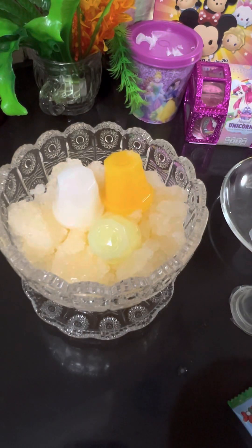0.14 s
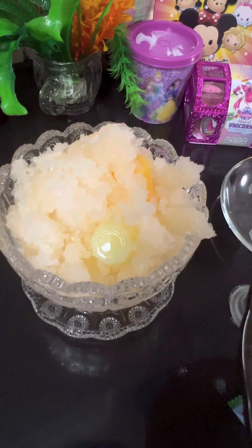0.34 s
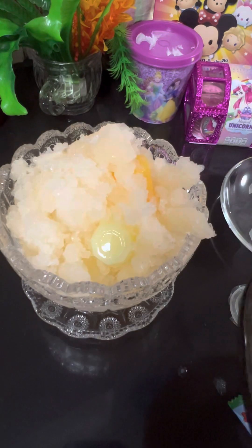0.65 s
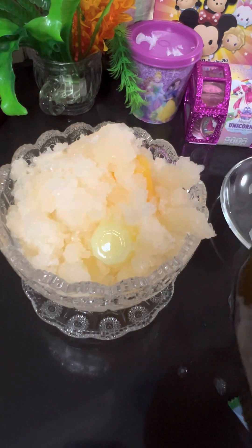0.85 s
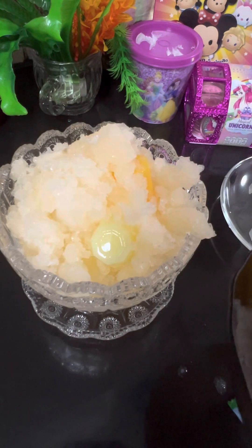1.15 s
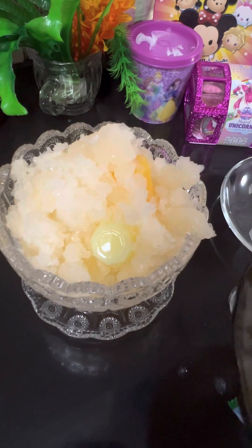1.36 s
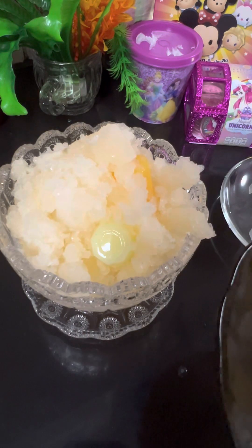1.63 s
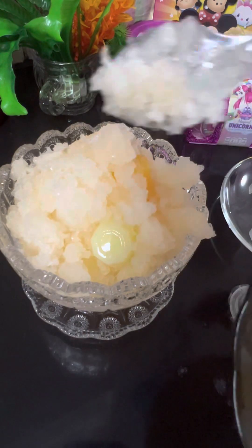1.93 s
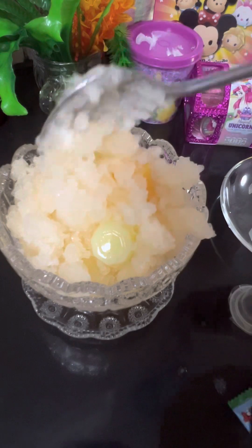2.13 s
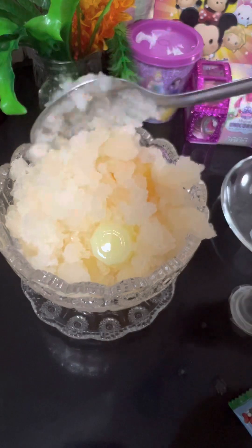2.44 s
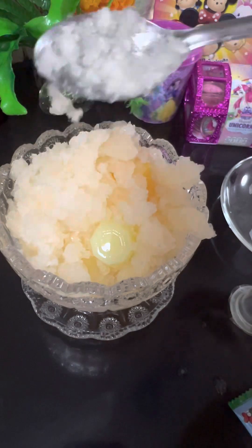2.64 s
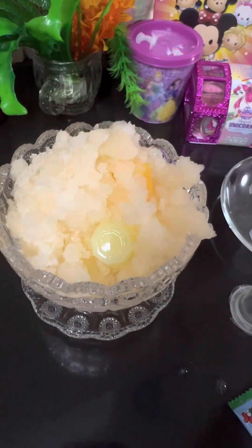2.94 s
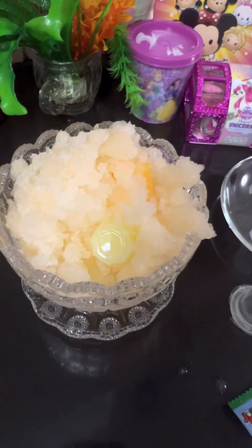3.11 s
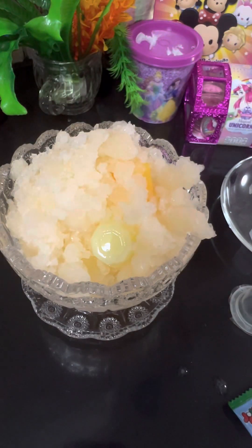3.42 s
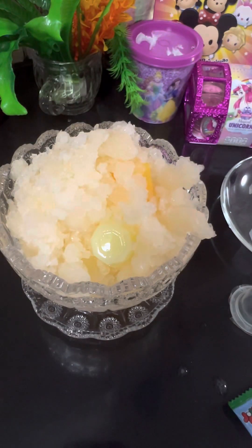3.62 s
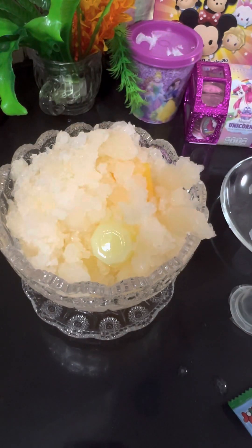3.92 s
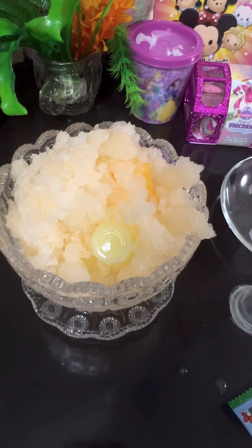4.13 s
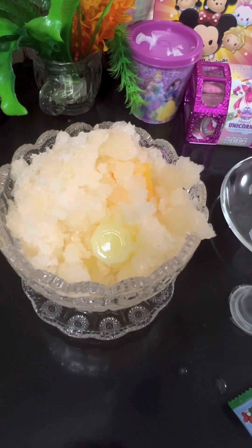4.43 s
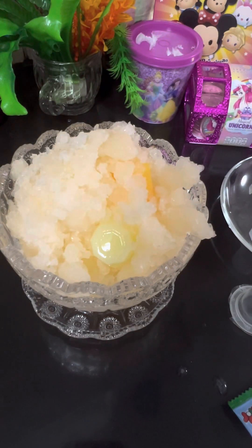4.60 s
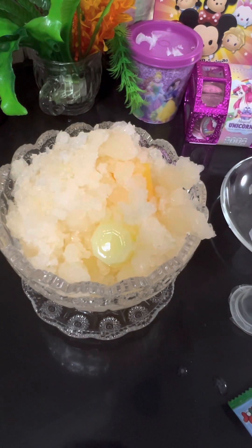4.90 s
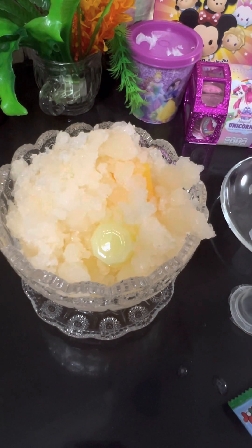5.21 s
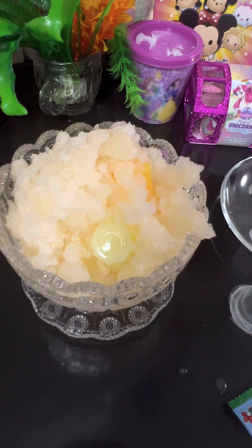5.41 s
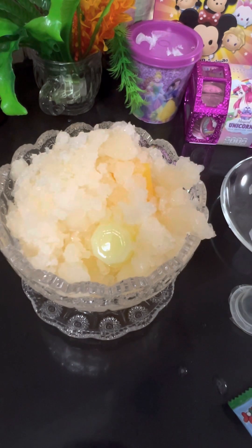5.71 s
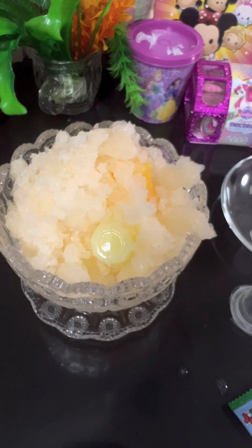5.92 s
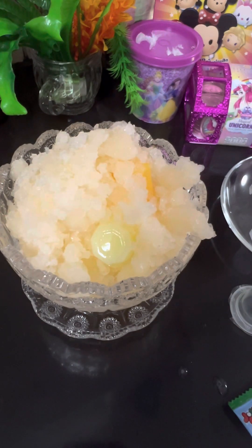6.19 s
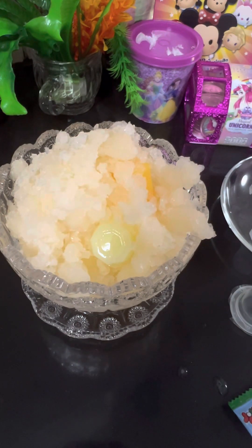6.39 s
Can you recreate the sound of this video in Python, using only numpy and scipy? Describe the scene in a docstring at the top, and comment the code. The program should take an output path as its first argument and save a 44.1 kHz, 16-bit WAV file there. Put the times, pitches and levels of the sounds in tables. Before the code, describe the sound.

A small, hard kitchen with faint low fan rumble and slightly wavering mains hum throughout. Close crisp ice crunches come at 0.1 and 0.25 s, with a tiny dropout near 0.35. From 0.6 to 1.0 s, lumps break in loud, dry, sharp snaps, with a metallic scrape around 0.75-0.85 and a slight steel-bowl ring. From 1.2 to 2.1 s only faint crackles and a soft hollow rustle at 1.8. Grainy scoops rasp at 2.35, 2.7 and 2.95; around 3.2 small cracks mix with quick spoon-on-glass clinks, more at 3.44 and 3.74. Roomier scoops follow at 3.57, 4.13, 4.48, a strong short one at 4.68, and another at 5.09. A bowl lands with a loud, hollow knock at 5.23, a buzzy clink at 5.36, a crunch at 5.45, then a softer double knock at 5.63-5.66. Near-quiet hum remains, with one barely audible rasp at 6.24.

```python
"""A metal spoon digs coarse shaved ice out of one bowl and heaps it into a glass one, in a small hard kitchen.
Lumps snap and loose crystals crunch close by: swells of noise grains filtered by resonances of bowl and spoon.
Scoops rasp farther off, the spoon's edge scrapes, and the spoon clinks with damped and free modes.
A bowl is set down with two knocks, the second one double: filtered noise bursts plus decaying sines.
Noise reflections form the room; fan rumble and wavering mains tones lie underneath."""
import sys
import numpy as np
from scipy import signal
from scipy.fft import rfft, irfft
from scipy.io import wavfile
from scipy.ndimage import uniform_filter1d, map_coordinates

SR = 44100
rng = np.random.default_rng(int(sys.argv[2]) if len(sys.argv) > 2 else 0)


def inscribe(sig):
    """Save sig as 16-bit PCM at rate SR to the path in sys.argv[1].

    A 1-D sig is mono; a 2-D sig holds one channel per row.
    Samples are clipped to [-1, 1] before scaling.
    """
    pcm = np.round(np.clip(np.atleast_2d(sig).T, -1, 1) * 32767)
    wavfile.write(sys.argv[1], SR, pcm.astype(np.int16))


N = 288855
SIZE, LEAD = 2 ** 15, 2 ** 13   # samples per event buffer; samples ahead of the event
EVENT_MS = (np.arange(SIZE) - LEAD) * 1000 / SR
SINCE_EVENT_S = np.maximum(EVENT_MS, 0) / 1000
BUFFER_S = np.arange(SIZE) / SR
HZ = np.maximum(np.arange(SIZE // 2 + 1) * SR / SIZE, 1)
MIC_DELAY_S = .0005

# Lumps cracking under the spoon. Each row: start in seconds, level in dB, low edge in Hz, tilt in dB per octave,
# decay of the crack in ms, share passed to the steel bowl in dB, crumbling in dB.
SNAPS = [(0.637, -17.5, 323, 1.14, 0.76, -27, -13.5), (0.6424, -33, 342, 0, 1.1, -16, 1),
         (0.7373, -17, 835, 0.5, 0.94, -23.5, -23), (0.882, -22.5, 710, 1.9, 0.35, -20.5, -20),
         (0.8846, -30.5, 744, -0.5, 0.75, -24, -17), (0.8898, -32.5, 730, -0.5, 0.79, -24, -15),
         (0.8966, -32, 710, 1.5, .7, -30, -19), (1.0113, -29.5, 854, 1, 1.05, -17, -18.5),
         (1.2523, -51, 650, -5.5, 1.1, -31, -24), (1.2955, -46, 800, -3, 1, -29, -24),
         (1.356, -58.5, 683, -2.5, 1.3, -33, -17), (2.395, -45.5, 2450, 4, 2.2, -24.5, -11),
         (2.402, -47, 2530, 1.5, 3.1, -28, -14), (2.425, -53.5, 455, -11.5, 2, -20, -14),
         (2.668, -57.5, 1200, 15.5, 3.1, -31, -11), (2.674, -54.5, 550, -12, 0.84, -12.5, -14),
         (2.989, -58, 5060, 8, 0.84, -28, -14), (3.063, -47.5, 513, -6, 1.4, -20, -11),
         (3.1748, -36, 358, 1.5, 1, -16, -16), (3.177, -37.5, 360, 1.2, 0.83, -16, -20),
         (5.836, -67.5, 2990, 2, 2.2, -32, -11)]
# Resonances of the packed bowl under a blow. Each row: frequency in Hz, width in Hz, level in dB.
LUMP_MODES = [(457, 44, 3), (862, 86, 6.5), (1126, 83, 3), (1440, 120, -6.5), (1740, 440, -0.5),
              (2605, 290, -0.5), (4480, 1700, -7), (5540, 53, -5), (7850, 540, -2.5), (9340, 400, -7),
              (11900, 1900, -6), (15000, 1200, -22.5)]
# Clusters of close modes in the steel ice bowl. Each row: frequency in Hz, width in Hz, level in dB.
ICE_BOWL_MODES = [(980, 92, -1.5), (1760, 160, -6.5), (2424, 120, 2.5), (2682, 91, 4.5), (4260, 250, -3.5),
                  (4800, 180, -0.5)]
# a typical lump; smaller ones have a higher edge, clang more and shake the room less
LUMP_EDGE_HZ, LUMP_LEVEL_DB = 720, -42.5
CLANG_DB, CLANG_DB_PER_OCTAVE, CLANG_DB_PER_DB = -0.5, 3.5, 0.05
# louder snaps are closer and drier
SNAP_ROOM_DB, ROOM_LOSS_DB_PER_OCTAVE, ROOM_LOSS_DB_PER_DB = -12.5, 7.5, 0.32
STEEL_CONTACT_DB = 18   # a blow that reaches the steel also takes on its colour


def snaps(split_db=-7, crumble_ms=6.7, strain_ms=0.54, clang_hz=3000):
    """A lump strains, splits and crumbles for a few ms; returns direct sound, room share and steel share."""
    near, far, steel = np.zeros((3, 2, N))
    lump = from_db(resonant(LUMP_MODES, between_db=-8.0))
    bowl = from_db(resonant(ICE_BOWL_MODES, between_db=-18.0))
    clang = np.exp(-2 * np.log2(HZ / clang_hz) ** 2)
    for s, level_db, low_hz, tilt_db, decay_ms, steel_db, crumble_db in SNAPS:
        smallness_octaves = np.log2(low_hz / LUMP_EDGE_HZ)
        force_db = level_db - LUMP_LEVEL_DB
        clang_db = CLANG_DB + CLANG_DB_PER_OCTAVE * smallness_octaves + CLANG_DB_PER_DB * force_db
        room_loss_db = ROOM_LOSS_DB_PER_OCTAVE * smallness_octaves + ROOM_LOSS_DB_PER_DB * force_db
        room_db = SNAP_ROOM_DB - room_loss_db

        crack = grains(0.22, decay_ms, grain_db=8.5, alike=0.63)
        crack = crack + from_db(crumble_db) * grains(strain_ms, crumble_ms, grain_db=6.0, alike=1.0)
        # the split itself is one sharp click
        crack[:, LEAD] += from_db(split_db) * np.sqrt(np.sum(crack ** 2) / 2)

        # flatten the burst's own spectrum, so the lump and bowl resonances set the colour
        crack_power = np.mean(np.abs(rfft(crack)) ** 2, axis=0)
        even_db = -10 * np.log10(uniform_filter1d(crack_power, size=300))
        low_cut_db = -10 * np.log10(1 + (low_hz / np.maximum(HZ, 150)) ** 8)
        body_db = 20 * np.log10(np.hypot(lump, bowl * from_db(steel_db + STEEL_CONTACT_DB)))
        body_db = body_db + own_resonances(depth_db=3.5)
        sound = shaped(crack, body_db + even_db + low_cut_db + clang_db * clang, tilt_db)
        add(near, s, sound, level_db)
        add(far, s, sound, level_db + room_db)
        add(steel, s, sound, level_db + steel_db)
    return near, far, steel


def ice_bowl(push, ring_t60=0.17):
    """The steel bowl rings on after snaps and scrapes: convolution with decaying modal noise."""
    noise = pair(rng.standard_normal((2, SIZE)), 1.0)
    ring = irfft(rfft(noise) * from_db(resonant(ICE_BOWL_MODES, between_db=-20.0)))
    ring = ring * from_db(-60 * BUFFER_S / ring_t60)
    return signal.fftconvolve(push, rms_one(ring) / np.sqrt(SIZE), axes=1)[:, :N]


# Loose crystals crushed close by. Each row: peak in seconds, level in dB, rise in ms, fall in ms, low edge in Hz,
# colouring by the spoon from 0 to 1.
CRUNCHES = [(0.093, -34, 4.9, 37, 400, 0), (0.2343, -33, 1.8, 18, 400, .15), (.25, -33, 4.6, 13, 400, 0),
            (.272, -43.5, 9.8, 37, 400, 0.04), (0.595, -43, 1.8, 20.7, 400, 0.24),
            (0.776, -41.5, 135, 220, 800, 0.2), (.915, -44, 14, 60, 790, 0.4), (1.02, -56, 27, 73, 798, .2),
            (1.24, -55.5, 23, 64, 4000, 0.26), (1.32, -55.5, 33, 89, 500, 0.14),
            (1.431, -55.5, 8.6, 8.4, 3010, 0), (2.011, -53.5, 5.7, 49, 3300, 0.03),
            (2.074, -48, 18, 61, 3440, 0.27), (3.034, -50, 8.6, 35, 3000, 0.24),
            (3.19, -48.5, 30, 42, 2500, .6), (3.973, -59.5, 13, 75, 500, 0.4),
            (4.08, -54, 30, 170, 503, 0.67), (4.428, -55.5, 26, 122, 2040, 0.24),
            (5.445, -48.5, 21.6, 69, 500, 0), (5.621, -50, 5.7, 68, 2480, .1)]
# Colour of the crunches. Each row: frequency in Hz, level in dB.
CRUNCH_COLOUR = [(150, -13), (400, -20.5), (800, -6), (1600, -7.5), (3200, -1), (5000, -0.5), (7000, 4.5),
                 (9500, 3), (12000, 6), (15500, 6.5)]
# Brightness of the crunches over time. Each row: time in seconds, tilt in dB per octave.
CRUNCH_TILT = [(.2, -3.5), (2, -4), (3.1, -2), (4, -7), (5.5, -7.5)]
# Spoon modes, also played by clinks(). Each row: frequency in Hz, damped width in Hz, level in contact in dB,
# level ringing free in dB.
SPOON_MODES = [(2065, 130, -8.5, -15), (3125, 44, -3, -2), (3420, 230, -5.5, -6), (5780, 94, -1.5, 1),
               (7800, 340, -11.5, -14), (8600, 260, -12, -6), (9340, 180, -7.5, 1), (11150, 160, -14, -4),
               (12985, 170, -8, -8), (15050, 170, -13, -14)]
FINE_SHELF_DB = -8   # fine crystals are weaker below their low edge
CRUNCH_ROUNDNESS = 1.7   # holds for a moment, then ends quickly


def crunches():
    """Loose crystals give way quickly and trickle on; those that rub on the spoon take on its resonances."""
    out = np.zeros((2, N))
    spoon_db = resonant([mode[:3] for mode in SPOON_MODES], between_db=-20)
    for s, level_db, rise_ms, fall_ms, low_hz, on_spoon in CRUNCHES:
        swarm = crackle(rise_ms, fall_ms, grain_db=3.5, clump_db=2.0, alike=0.38,
                        roundness=CRUNCH_ROUNDNESS, count=3)
        below_edge = 1 / (1 + (HZ / low_hz) ** 12)
        colour_db = at_hz(CRUNCH_COLOUR, HZ) + FINE_SHELF_DB * below_edge
        colour_db = colour_db + on_spoon * spoon_db + own_resonances(depth_db=3.0)
        tilt_db = np.interp(s, *np.transpose(CRUNCH_TILT))
        add(out, s, shaped(swarm, colour_db, tilt_db), level_db)
    return out


# The spoon ploughing through the heap. Each row: peak in seconds, level in dB, rise in ms, tilt in dB per octave,
# room share in dB.
SCOOPS = [(0, -53, 8.1, 10, -0.5), (1.52, -75, 15, 10, -3), (2.345, -43.5, 46, 3, -2),
          (2.68, -53, 7.9, -2, -2), (2.948, -43, 35, 1.5, -1.5), (3.569, -45.5, 23.6, 2.5, -2),
          (4.131, -38, 7.1, 1.5, -5), (4.179, -45, 8.8, 2, -1), (4.476, -45.5, 3, -2.5, 2),
          (4.643, -51, 29, 0.5, -1.5), (4.675, -34.5, 3.4, -2, -5), (4.961, -70.5, 52, -5, 0.5),
          (5.088, -40, 4.4, -3, -1.5), (5.441, -46.5, 40, -3.5, 0), (6.24, -69.5, 57, -0.5, -2.5)]
# Colour of the scoops. Each row: frequency in Hz, level in dB.
SCOOP_COLOUR = [(120, -7.5), (400, -2), (750, -2), (1100, -2.5), (1420, -4.5), (1850, -1), (2500, 1.5),
                (3300, -1.5), (3900, -2.5), (4550, -4.5), (5500, -13), (7500, -14), (10000, -22.5),
                (15500, -31.5)]
SCOOP_FALL_MS, SCOOP_FALL_GROWTH = 18.5, 0.25   # fall after a 10 ms rise; exponent on the rise


def scoops():
    """The spoon ploughs coarse ice; slow pushes also die away more slowly; returns direct sound and room share."""
    near, far = np.zeros((2, 2, N))
    for s, level_db, rise_ms, tilt_db, room_db in SCOOPS:
        fall_ms = SCOOP_FALL_MS * (rise_ms / 10) ** SCOOP_FALL_GROWTH
        swarm = crackle(rise_ms, fall_ms, grain_db=5.5, clump_db=2.5, alike=0.42, roundness=1.3)
        sound = shaped(swarm, at_hz(SCOOP_COLOUR, HZ) + own_resonances(depth_db=2.6), tilt_db)
        add(near, s, sound, level_db)
        add(far, s, sound, level_db + room_db)
    return near, far


# The spoon's edge dragging over hard ice. Each row: peak in seconds, level in dB, rise in ms, fall in ms.
SCRAPES = [(0.754, -40.5, 8, 32), (.835, -34.5, 45, 40)]
# Resonances of the scrape. Each row: frequency in Hz, width in Hz, level in dB.
SCRAPE_MODES = [(1020, 230, -9), (1930, 290, -0.5), (2430, 130, 6), (3050, 230, -6.5), (4090, 400, -3),
                (4650, 190, 3), (7460, 1200, -12)]


def scrapes(slide=0.021, slides_per_s=70):
    """The spoon's edge drags over hard ice; resonances shift by a few percent as the contact slides."""
    out = np.zeros((2, N))
    for s, level_db, rise_ms, fall_ms in SCRAPES:
        swarm = crackle(rise_ms, fall_ms, grain_db=6.0, clump_db=4.0, alike=0.56)
        rasp = shaped(swarm, resonant(SCRAPE_MODES, between_db=-19.5), 0)
        shift_samples = slide * SR / slides_per_s * drift(slides_per_s, size=SIZE)
        position = np.arange(SIZE) + shift_samples
        add(out, s, np.stack([map_coordinates(side, [position]) for side in rasp]), level_db)
    return out


# The spoon grazing the glass. Each row: start in seconds, level in dB, chatter in ms, tilt in dB per octave,
# pitch ratio set by the grip, twisting mode in dB.
CLINKS = [(3.179, -42.5, 9.1, -1, 0.83, -4), (3.211, -46, 15, 3.5, 1, 1), (3.2783, -44, 3, -1, 0.96, -16),
          (3.438, -40.5, 9.6, -2, 0.99, -11), (3.736, -46, 30, -2, 0.99, -12),
          (5.361, -38.5, 34, -6, 1.035, -0.5)]
TWIST_HZ, TWIST_WIDTH_HZ = 4260, 160   # twisting mode, strong in some clinks and weak in others


def clinks(between_db=-27, ring_db=-14.0, ring_t60=0.15, flutter_db=4, buzz_rad=1.1):
    """The spoon chatters on the rim, damped by hand and ice; a short, buzzing ring starts with the touch."""
    out = np.zeros((2, N))
    t = SINCE_EVENT_S
    for s, level_db, chatter_ms, tilt_db, pitch, twist_db in CLINKS:
        contact_modes = [mode[:3] for mode in SPOON_MODES] + [(TWIST_HZ, TWIST_WIDTH_HZ, twist_db)]
        damped_db = resonant(contact_modes, between_db, pitch)
        chatter = grains(1.0, chatter_ms, grain_db=1.0, alike=0.51, clump_db=-1.5)
        add(out, s, shaped(chatter, damped_db, tilt_db), level_db)

        ring = 0
        for hz, width_hz, contact_db, free_db in SPOON_MODES:
            mode_db = free_db + tilt_db * np.log2(hz) + flutter_db * drift(139, size=SIZE)
            phase = 2 * np.pi * hz * pitch * t + buzz_rad * drift(299.7, size=SIZE) + rng.random((2, 1))
            ring = ring + from_db(mode_db) * np.sin(phase)
        envelope = (1 - np.exp(-t / 0.0017)) * from_db(-60 * t / ring_t60)
        add(out, s, ring * envelope, level_db + ring_db)
    return out


# A bowl set down on the table. Each row: start in seconds, level in dB, tilt in dB per octave.
KNOCKS = [(5.228, -21.5, 3), (5.632, -42, -4.5), (5.6556, -31, -0.5)]
# Modes of bowl and table top. Each row: frequency in Hz, level in dB, t60 in seconds.
TABLE_MODES = [(209, -7.5, 0.32), (348.2, -6.5, 0.25), (421, -3.5, 0.3), (479, -8.5, 0.52),
               (524, -9.5, 0.44), (710, -0.5, 0.36), (810, -3, .13), (876, -0.5, 0.272), (910, -9, .3),
               (1126, 1, 0.24), (1150, 2.5, 0.25), (1303, -5.5, 0.17), (1320, 4, 0.17), (1426, 1, .2),
               (1568, -8, 0.12), (1890, -8.5, .28), (2094, -4.5, 0.16), (2730, -12, .28)]
# Colour of the blow. Each row: frequency in Hz, level in dB.
KNOCK_COLOUR = [(25, -37), (70, -16.5), (150, -6), (430, -4.5), (580, -0.5), (800, 1.5), (1100, 5),
                (1450, 3), (1750, -3.5), (2250, -5.5), (2900, -15), (4500, -24), (5500, -38), (8500, -39),
                (15500, -52.5)]
KNOCK_RISE_MS, KNOCK_FALL_MS = 4.7, 7.5
RATTLE_GAP_S, RATTLE_LOSS_DB = 0.027, 13.5   # per contact as the foot settles


def knocks(ring_db=-5, count=3):
    """The bowl's foot strikes the table and rattles to rest; returns the blow and the ringing after it."""
    blow, ringing = np.zeros((2, 2, N))
    t = SINCE_EVENT_S
    ear_t = t - np.array([[0], [MIC_DELAY_S]])   # the right microphone hears it later
    for s, level_db, tilt_db in KNOCKS:
        for k in range(count):
            when, contact_db = s + k * RATTLE_GAP_S, level_db - k * RATTLE_LOSS_DB
            burst = crackle(KNOCK_RISE_MS, KNOCK_FALL_MS, grain_db=3.5, clump_db=2.5, alike=-.1)
            add(blow, when, shaped(burst, at_hz(KNOCK_COLOUR, HZ), tilt_db), contact_db)

            modes = 0
            for hz, db, t60 in TABLE_MODES:
                tone = np.sin(2 * np.pi * (hz * ear_t + rng.random()))
                modes = modes + from_db(db - 60 * t / t60) * tone
            add(ringing, when, modes * (1 - np.exp(-t / 0.0031)), contact_db + ring_db)
    return blow, ringing


def rustle(s=1.8, level_db=-60.0, hz=560, width_hz=140):
    """A soft, hollow rustle between two spoonfuls: one swell of grains through one resonance."""
    out = np.zeros((2, N))
    swell = grains(70, 54, grain_db=6.5, alike=0.17, clump_db=2.5)
    add(out, s, shaped(swell, resonant([(hz, width_hz, 0)], between_db=-41), 0), level_db)
    return out


# Echoes from the table top and the dishes around. Each row: delay in ms, level in dB.
NEAR_ECHOES = [(.7, -25), (1.65, -25.5), (3.1, -26.5)]


def table_top(x):
    """Early echoes comb the colour of near sounds; the sum is scaled to add no power."""
    out = x.copy()
    for delay_ms, db in NEAR_ECHOES:
        delay = int(delay_ms * SR / 1000)
        out += from_db(db) * np.pad(x, ((0, 0), (delay, 0)))[:, :N]
    return out / np.sqrt(1 + sum(from_db(db) ** 2 for delay_ms, db in NEAR_ECHOES))


# Kitchen reverberation. Each row: frequency in Hz, t60 in seconds.
KITCHEN = [(150, 0.53), (600, 0.46), (1500, 0.36), (3000, 0.41), (6000, 0.41), (10000, 0.25), (16000, 0.2)]


def kitchen(x):
    """Dense reflections that build up in a few ms and decay at a rate set per band, fastest at the top."""
    noise = rfft(diffuse(SIZE, [(20, 0), (20000, 0)]))
    centres, tail = np.log([hz for hz, t60 in KITCHEN]), 0
    for band, (hz, t60) in zip(np.eye(len(KITCHEN)), KITCHEN):
        band_noise = irfft(noise * np.interp(np.log(HZ), centres, band))
        tail = tail + band_noise * from_db(-60 * BUFFER_S / t60)
    tail = rms_one(tail * (1 - np.exp(-BUFFER_S / 0.0011))) / np.sqrt(SIZE)
    return signal.fftconvolve(x, tail, axes=1)[:, :N]


# Mains and fan tones. Each row: frequency in Hz, level in dB, phase waver in radians.
HUM = [(49.2, -68.5, .8), (100.1, -60, .25), (146.8, -61, .5), (204.2, -67, 2.2)]
# Colour of the fan rumble. Each row: frequency in Hz, level in dB before scaling to unit rms.
AIR_COLOUR = [(20, -25.5), (32, -22), (48, -12), (80, -9.5), (150, -6.5), (260, -13.5), (420, -15),
              (650, -26.5), (900, -22), (1300, -30), (4400, -40.5), (5600, -43.5), (14000, -51),
              (16000, -67.5)]


def background(air_db=-59.5, swell_db=1.1):
    """Fan rumble as coloured noise, and hum tones that waver in pitch and level."""
    t = np.arange(N) / SR
    hum = 0
    for hz, db, waver_rad in HUM:
        gain = from_db(db + swell_db * drift(rate=11)) * np.sqrt(2)
        hum = hum + gain * np.sin(2 * np.pi * hz * t + waver_rad * drift(rate=5.8))
    return hum + from_db(air_db) * rms_one(diffuse(N, AIR_COLOUR))


def off_centre(x):
    """The spoon works a little to the right, so the left microphone hears it one sample later."""
    return np.stack([np.roll(x[0], 1), x[1]])


def crackle(rise_ms, fall_ms, grain_db, clump_db, alike, roundness=1, count=4):
    """Crystals of each size break at their own moments and sound in their own part of the spectrum."""
    centres, spectrum = np.log(np.geomspace(1000, 8000, count)), 0
    for band in np.eye(count):
        swarm = grains(rise_ms, fall_ms, grain_db, alike, clump_db, roundness)
        spectrum = spectrum + rfft(swarm) * np.sqrt(np.interp(np.log(HZ), centres, band))
    return irfft(spectrum)


def grains(rise_ms, fall_ms, grain_db, alike, clump_db=0, roundness=1):
    """A swell of tiny uneven fractures in clumps of a few ms; a rounder swell holds longer and ends sooner."""
    sizes = from_db(grain_db * uneven(size=16) + clump_db * uneven(size=128))
    swell = np.exp(-(np.abs(EVENT_MS) / np.where(EVENT_MS < 0, rise_ms, fall_ms)) ** roundness)
    return pair(rng.standard_normal((2, SIZE)), alike) * sizes * swell


def uneven(size):
    """Random steps that each last size samples."""
    return np.repeat(np.clip(rng.standard_normal(SIZE // size), -2.2, 2.2), size)


def resonant(modes, between_db, pitch=1):
    """Colour in dB of a body with damped resonances over a floor that falls in the treble."""
    power = sum(from_db(db) ** 2 / (1 + ((HZ - hz * pitch) / width_hz) ** 2) ** 2
                for hz, width_hz, db in modes)
    return 10 * np.log10(power + from_db(between_db) ** 2 / (1 + (HZ / 5000) ** 2))


def own_resonances(depth_db, spacing_hz=260):
    """Every spoonful has its own peaks and dips in dB, set by the lumps and hollows in it."""
    knots = np.clip(rng.standard_normal(SIZE), -2, 2)
    return depth_db * np.interp(HZ / spacing_hz, np.arange(SIZE), knots)


def shaped(x, colour_db, tilt_db):
    """Causal (minimum-phase) filter with a given colour, and a tilt per octave above 400 Hz."""
    octaves = np.log2(np.maximum(HZ, 400) / 400)
    cepstrum = irfft(np.log(from_db(colour_db + tilt_db * octaves)))
    cepstrum[1:SIZE // 2] *= 2   # fold onto positive time
    cepstrum[SIZE // 2 + 1:] = 0
    return irfft(rfft(x) * np.exp(rfft(cepstrum)))


def pair(two, alike):
    """Mix two noises into left and right; long waves reach both microphones alike, short ones less so."""
    size = two.shape[1]
    hz = np.arange(size // 2 + 1) * SR / size
    alike = np.clip(alike + (1 - alike) * .98 * np.sinc(2 * hz * MIC_DELAY_S), -1, 1)
    mid, side = rfft(two)
    return irfft(np.sqrt(1 + alike) * mid + np.sqrt(1 - alike) * side * [[1], [-1]], size) / np.sqrt(2)


def diffuse(size, colour):
    """Coloured noise arriving from all sides."""
    hz = np.maximum(np.arange(size // 2 + 1) * SR / size, 1)
    noise = pair(rng.standard_normal((2, size)), 0)
    return irfft(rfft(noise) * from_db(at_hz(colour, hz)), size)


def drift(rate, size=N):
    """A random wander: standard normal knots, rate per second, joined by straight lines."""
    knots = rng.standard_normal(size)
    return np.interp(np.arange(size) / SR * rate, np.arange(size), knots)


def add(track, s, sound, level_db):
    """Lay a sound in at time s, with its loudest 10 ms at the given level."""
    loudest = np.sqrt(uniform_filter1d(np.mean(sound ** 2, axis=0), size=441).max())
    start = int(round(s * SR)) - LEAD
    first, last = max(start, 0), min(start + SIZE, N)
    track[:, first:last] += sound[:, first - start:last - start] * from_db(level_db) / loudest


def from_db(db):
    """Decibels to gain."""
    return 10 ** (np.asarray(db) / 20)


def rms_one(x):
    """Scale to unit rms."""
    return x / np.sqrt(np.mean(x ** 2) + 1e-20)


def at_hz(points, hz):
    """Read a table along a log-frequency axis."""
    return np.interp(np.log(hz), *np.transpose([(np.log(f), v) for f, v in points]))


def scene():
    """Near sounds are mostly direct, far ones mostly room; the knocks lean to the left."""
    snap, snap_room, snap_steel = snaps()
    scoop, scoop_room = scoops()
    crunch, scrape, clink = crunches(), scrapes(), clinks()
    blow, ringing = knocks()
    steel = ice_bowl(snap_steel + from_db(-16) * scrape)

    near_ice = table_top(snap + crunch + scrape + from_db(-3.0) * scoop)
    direct = off_centre(near_ice + from_db(-1.5) * clink) + steel
    far_ice = table_top(snap_room + from_db(-12.5) * crunch + from_db(-7.0) * scrape + scoop_room)
    room = kitchen(far_ice + from_db(-4.5) * clink)
    bowl = from_db(1.5) * blow + ringing + from_db(2.5) * kitchen(blow)
    bowl = bowl * from_db([[1.1], [-0.8]])   # left, right
    return direct + room + bowl + rustle() + background()


def record(dry, cutoff_hz=16100):
    """The level dips briefly near the start; peaks are rounded and the top is cut."""
    dip = 1 - .9 * np.exp(-((np.arange(N) / SR - .345) / .005) ** 4)
    rounded = 1.068 * np.tanh(dry * dip / 1.091)
    low_pass = signal.ellip(10, .1, 80, cutoff_hz, fs=SR, output="sos")
    return signal.sosfilt(low_pass, rounded)


dry = scene()
out = record(dry)
inscribe(out)
```